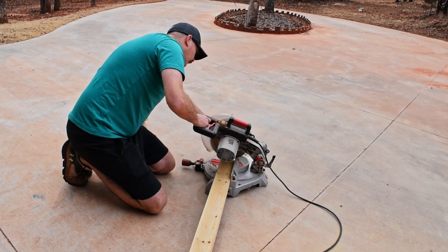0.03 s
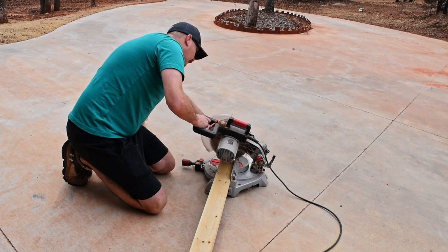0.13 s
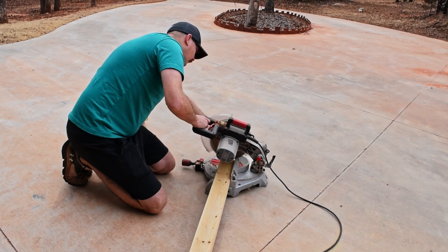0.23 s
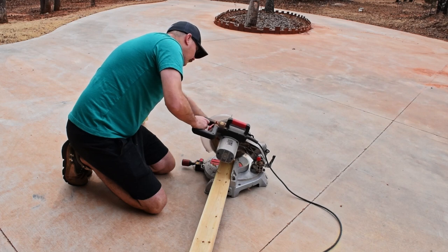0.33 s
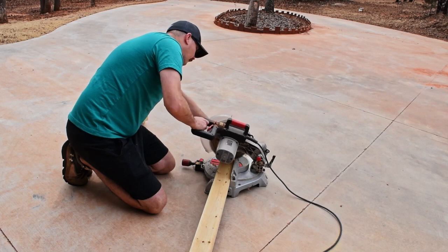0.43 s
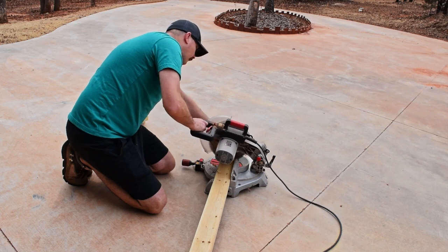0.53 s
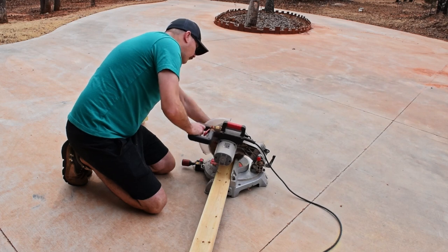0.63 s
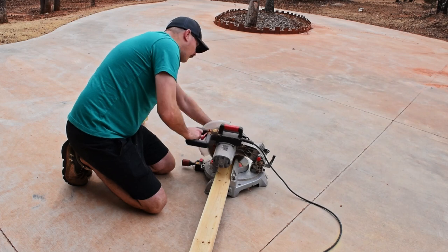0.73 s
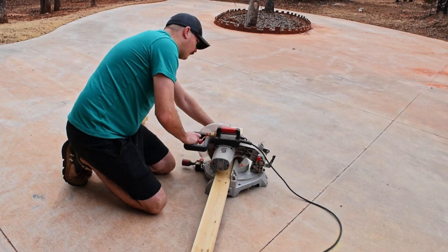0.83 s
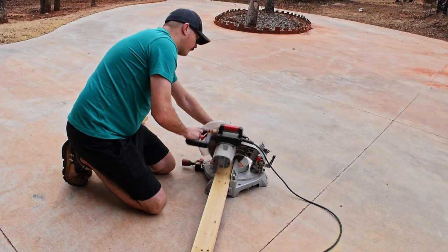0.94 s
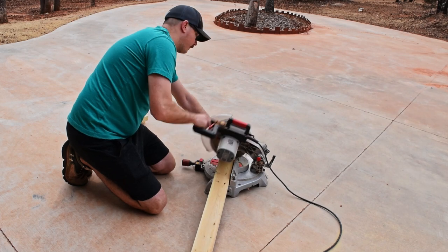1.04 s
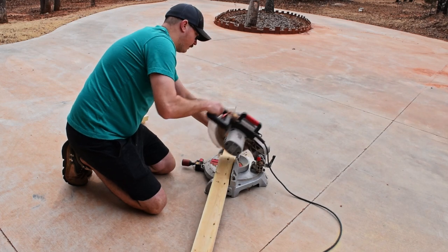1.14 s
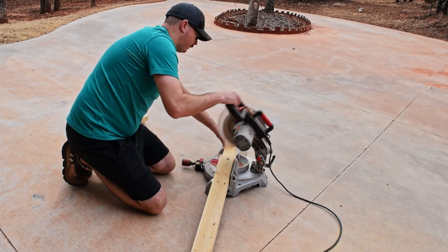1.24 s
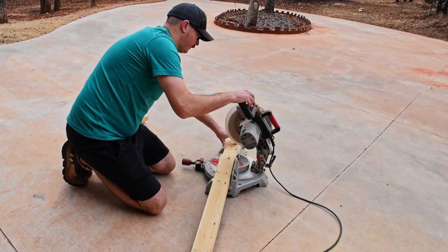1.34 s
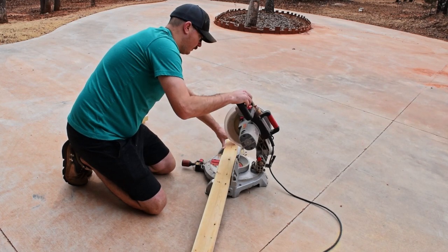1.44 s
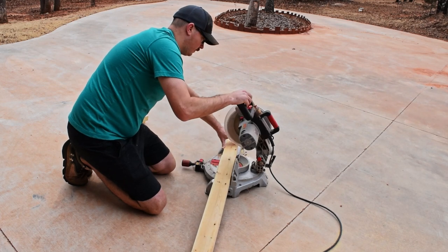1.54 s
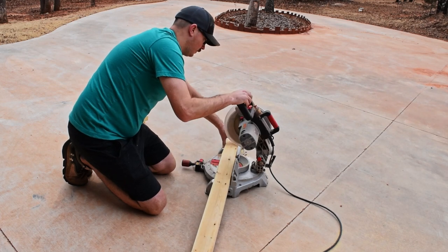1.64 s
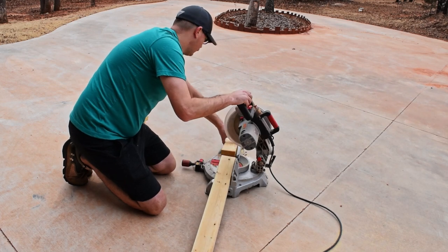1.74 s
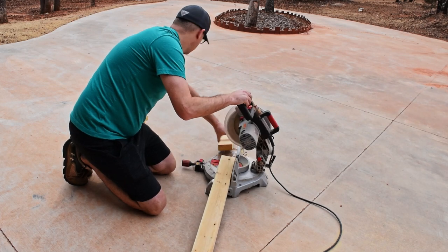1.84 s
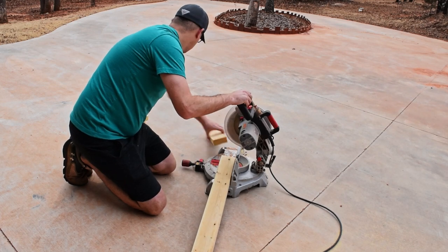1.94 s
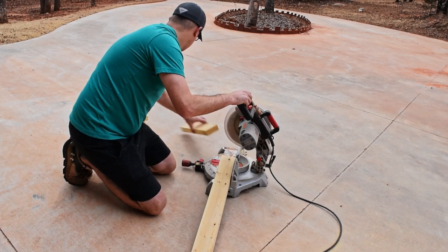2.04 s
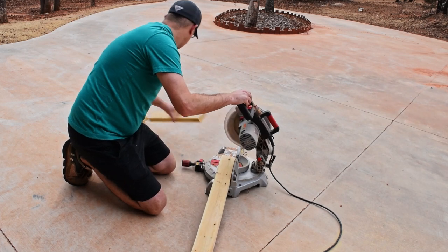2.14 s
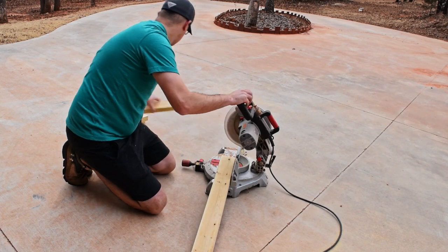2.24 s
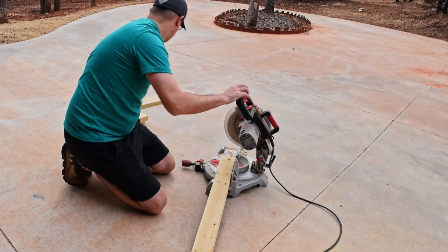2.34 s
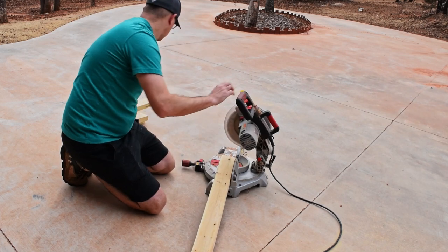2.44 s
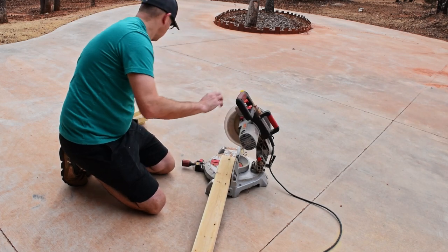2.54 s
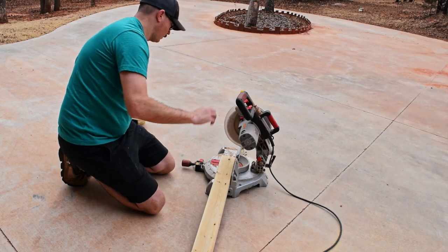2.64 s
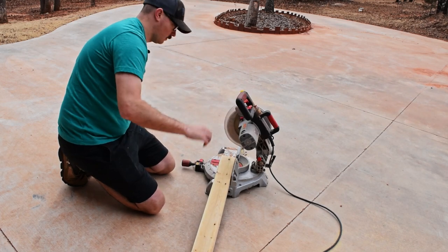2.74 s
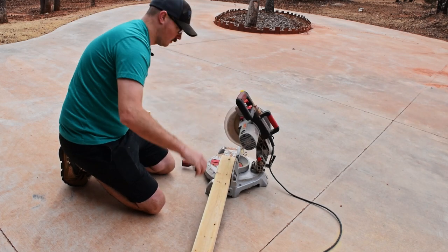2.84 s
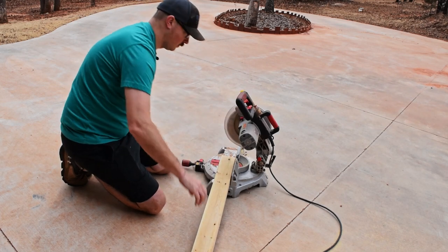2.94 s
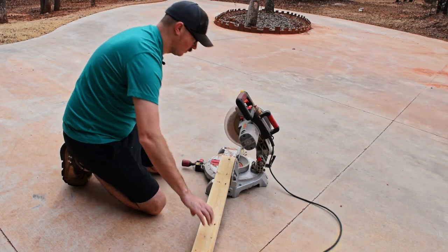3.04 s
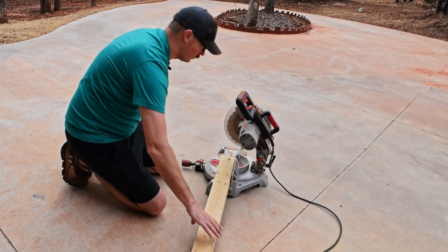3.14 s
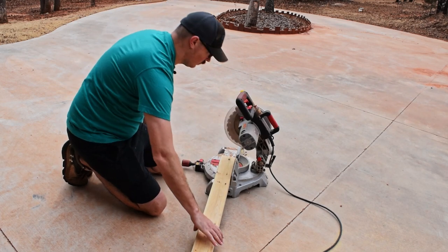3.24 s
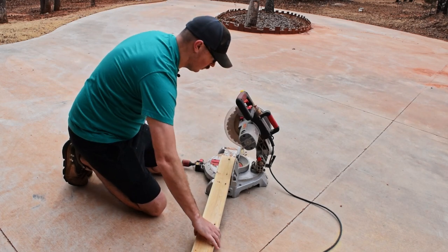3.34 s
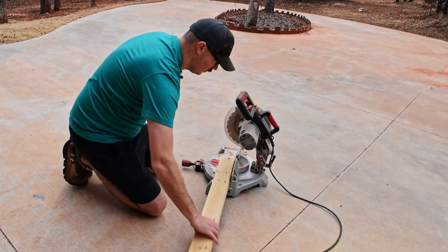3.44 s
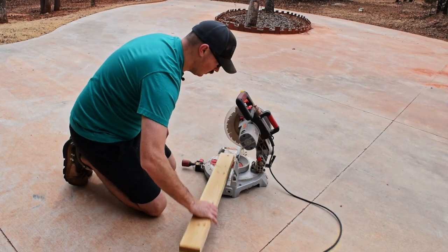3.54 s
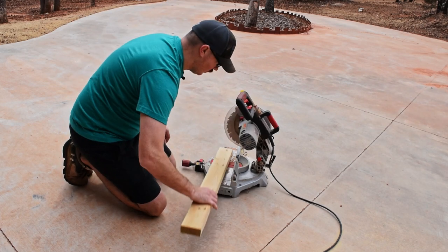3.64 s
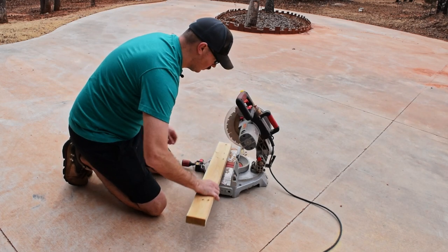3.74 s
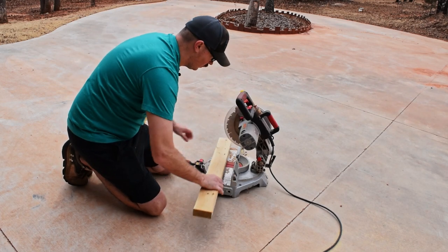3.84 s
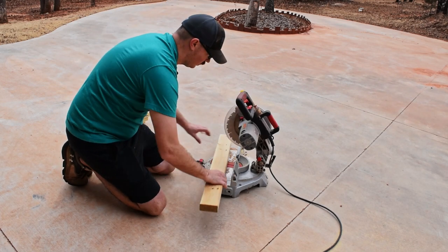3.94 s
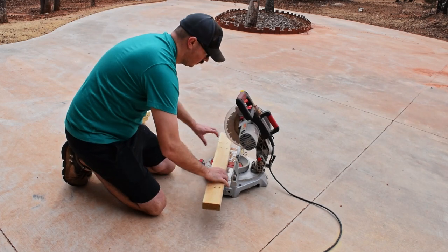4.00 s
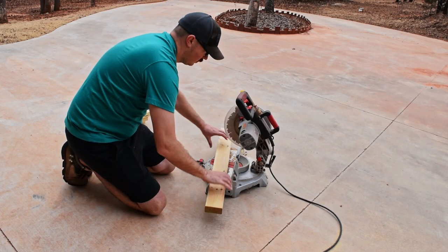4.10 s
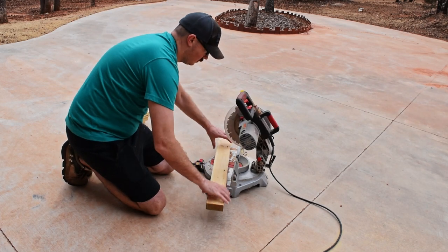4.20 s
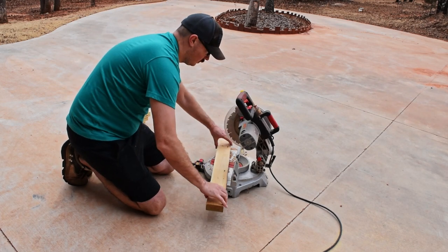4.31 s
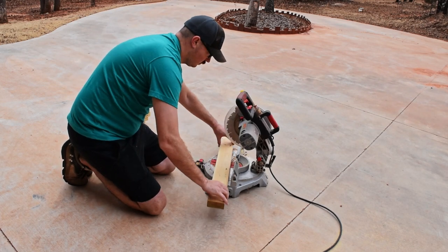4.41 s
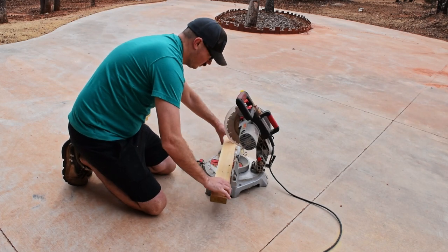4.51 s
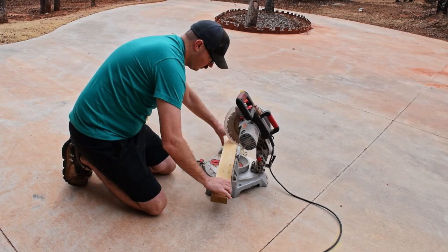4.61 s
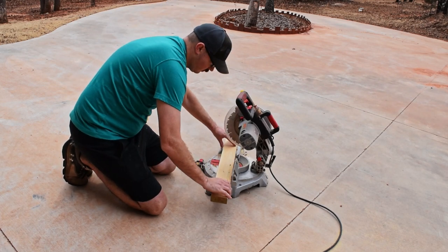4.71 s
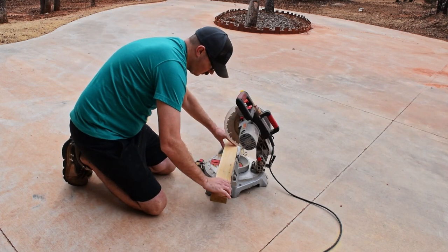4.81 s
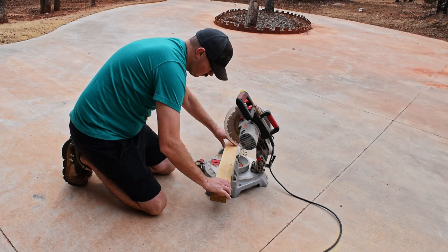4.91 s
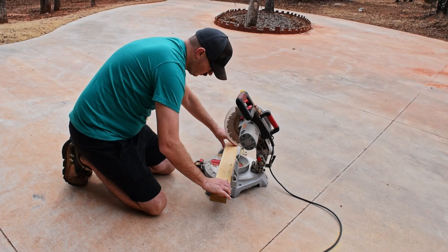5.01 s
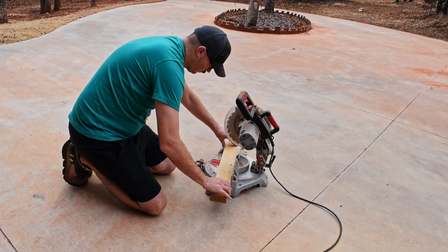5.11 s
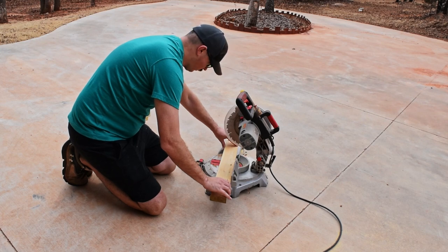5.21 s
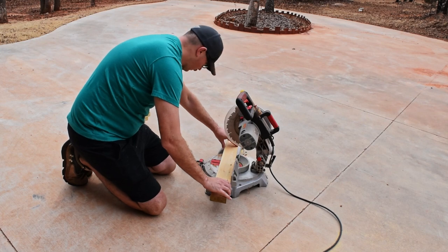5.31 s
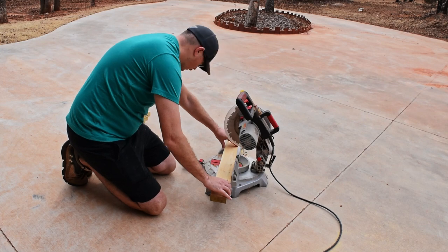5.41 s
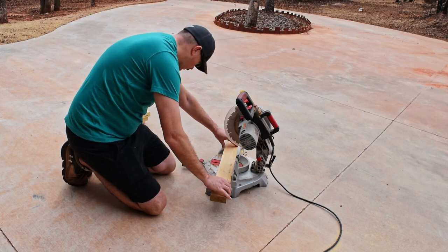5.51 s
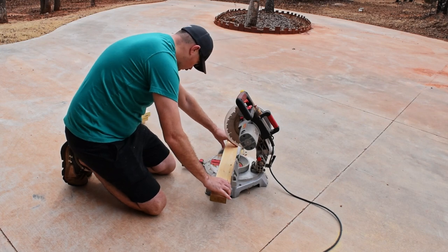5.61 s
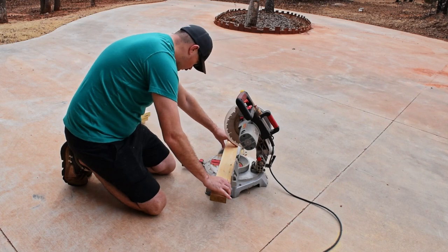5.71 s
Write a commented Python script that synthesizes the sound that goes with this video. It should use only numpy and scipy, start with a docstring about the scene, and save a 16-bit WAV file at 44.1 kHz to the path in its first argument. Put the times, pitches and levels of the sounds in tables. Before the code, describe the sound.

An electric saw rips through wood and winds down outdoors, followed by a block clacking on concrete and a board sliding and knocking.

```python
"""On an outdoor concrete slab, a miter saw tears through the end of a cut, races free and is braked.
Its whine sinks with the blade's speed and the slack gears rattle as it runs down. The offcut knocks
on the saw table and is put down; then the long board is dragged over grit and bumped against the
fence, over a faint breeze. One microphone feeds two channels at unequal gain, each with a fast limiter."""
import sys
import numpy as np
from scipy import signal
from scipy.fft import rfft, irfft, next_fast_len
from scipy.io import wavfile
from scipy.ndimage import uniform_filter1d, minimum_filter1d, map_coordinates

SR = 44100
rng = np.random.default_rng(int(sys.argv[2]) if len(sys.argv) > 2 else 0)


def store_pcm(level_fs):
    """Save levels as 16-bit WAV."""
    pcm = np.round(np.clip(level_fs, -1, 1) * 32767).astype(np.int16)
    wavfile.write(sys.argv[1], SR, np.atleast_2d(pcm).T)


N = 253948
TIME = np.arange(N) / SR
TOP_HZ = 15800

# The course of the cut. Each row: time in seconds, then tearing, rasp and blade hiss levels in dB.
CUT_LEVELS = [(0.0, -37.5, -45.5, -43), (0.1, -28.5, -37, -33.5), (0.55, -26, -32, -26),
              (0.63, -32, -29.5, -23), (0.7, -26, -28, -30.5), (0.79, -36.5, -44.5, -49.5),
              (0.82, -67, -55, -79.5)]


def saw():
    """One speed drives the whine, the fan air, the blade's hiss and the rattling gear case."""
    # The motor bogs down, races free, is braked and coasts. Each row: time in seconds, tooth rate in Hz.
    speed = [(0, 1740), (.12, 1712), (.25, 1655), (.4, 1540), (.6, 1310), (.7, 1386), (.8, 1778),
             (.95, 2170), (1.0, 2190), (1.1, 1790), (1.22, 1360), (1.3, 1130), (1.48, 805), (1.78, 459),
             (2.1, 290), (2.55, 180), (2.93, 106), (3.15, 58), (3.7, 5)]
    tooth_hz = np.exp(curves([(s, np.log(hz)) for s, hz in speed])[0])
    tooth_cycles = np.cumsum(tooth_hz) / SR
    fan = running(tooth_hz, db=-48, knee_hz=945, db_per_octave=10.34)
    gears = gear_case(tooth_hz)
    air = rushing_air(tooth_hz, fan)
    cut = cutting(tooth_cycles)
    waver = amp(1.3 * wobble(24))
    return cut + gears + air * waver + whine(tooth_hz, tooth_cycles, fan) + singing_metal()


def cutting(tooth_cycles):
    """Teeth tear the wood in bursts and keep the blade ringing; the rasp grows as the blade digs in."""
    # Tone of tearing wood. Each row: frequency in Hz, level in dB.
    wood_colour = [(59, -56.5), (100, -18.5), (258, -14), (438, -14), (564, -14), (712, 4), (861, -2.5),
                   (1370, -16.5), (2580, -12.5), (3930, -10), (5510, -2), (7250, -1), (9740, -2.5),
                   (13100, 3), (15500, 3)]
    # Plate modes of the blade. Each row: frequency in Hz, level in dB.
    blade_modes = [(4829, -62), (4980, -53.5), (5453, -53), (6121, -57), (6740, -55), (7660, -63),
                   (7865, -59), (8489, -49), (8629, -65), (9049, -62), (9458, -61), (9615, -58),
                   (10196, -60), (10320, -53.5), (10519, -52), (11267, -56), (11515, -56.5), (11913, -50.5),
                   (12096, -56), (12462, -63.5), (12758, -61), (13539, -52.5), (14233, -57.5),
                   (14519, -60.5)]
    tear, rasp, _ = levels(CUT_LEVELS)
    bites = wide_noise() * (1 + .5 * np.cos(2 * np.pi * tooth_cycles))
    chips = coloured(rippled(bites, depth_db=1.8, spacing_hz=40), wood_colour)
    low = filtered(chips, lambda hz: 1 / (1 + (hz / 8200) ** 8))
    plate = unit(sum(amp(db) * noise_band(hz, 36) for hz, db in blade_modes))
    return tear * (amp(-2.5) * unit(chips - low) + amp(-10) * plate) + amp(-1.5) * rasp * unit(low)


def whine(tooth_hz, tooth_cycles, fan):
    """Harmonics of the tooth rate, sung by the teeth in the wood and then by the braked gears."""
    # Each row: multiple of the tooth rate, level in dB while braking, level in dB while cutting.
    harmonics = [(1, -17, -20), (2, -6, -20), (3, -28, -18), (4, -14.5, -21), (5, -24, -19), (6, -22, -13),
                 (7, -27, -14), (8, -20, -18), (9, -33, -11), (10, -30, -13.5), (12, -10, -30)]
    # How well the casing radiates the gears. Each row: frequency in Hz, gain in dB.
    casing_response = [(300, 0), (900, 4), (1200, 0), (1600, -1), (1900, -9), (2200, -4), (2450, 2),
                       (2800, -8), (3200, -6), (3650, 3), (4150, -5), (4650, 2), (5200, -3), (6200, 1),
                       (7000, -3), (7800, 1), (8700, -3), (9700, 14), (10900, 1), (13000, 6), (14000, 6),
                       (15000, -9)]
    # How well the blade radiates its teeth. Each row: frequency in Hz, gain in dB.
    blade_response = [(1400, 2), (3100, 0.5), (5000, 0.5), (7800, -6), (8500, 3.5), (9500, 3.5),
                      (10300, -3.5), (13600, -2.5), (14500, 3), (15500, 0)]
    # How hard the teeth are loaded. Each row: time in seconds, gain in dB.
    tooth_load = [(0, -2), (.3, 0), (.5, 3), (.63, -10), (.8, -25)]
    load = levels(CUT_LEVELS)[0] * levels(tooth_load)[0]
    brake_db = 8 * ramp(1.0, .26) - 4  # the brake loads the gears
    gear_gain = fan * amp(brake_db) * (tooth_hz / 1300) ** 0.093
    out = np.zeros(N)
    for order, braking_db, cutting_db in harmonics:
        hz, phase = order * tooth_hz, 2 * np.pi * order * tooth_cycles
        # Each gear partial is part tone, part noise band that narrows as it sinks.
        fray = np.clip(.68 + hz / 35000, 0, .99)
        width_hz = 900 * (hz / 10000) ** 2 + 20
        drift = np.cumsum(width_hz) / SR
        a, b = (map_coordinates(rng.standard_normal(SR // 2), [drift]) for _ in range(2))
        blur = (a * np.sin(phase) + b * np.cos(phase)) / np.sqrt(2)
        partial = np.sqrt(1 - fray ** 2) * np.sin(phase) + fray * blur
        gears = amp(braking_db + along(casing_response, hz)) * gear_gain * partial
        # The teeth grip unevenly, breaking up level and phase most in the treble.
        uneven = np.sqrt(hz / 10000)
        grip = unit(amp(4 * uneven * wobble(45)))
        jitter = .8 * uneven * wobble(160)
        teeth = amp(cutting_db + along(blade_response, hz)) * load * grip * np.sin(phase + jitter)
        flutter = amp(3.2 * wobble(30))
        out += (hz < TOP_HZ) * (flutter * gears + teeth)
    return out


def gear_case(tooth_hz):
    """The brake first holds the gears tight and quiet; then they go slack and rattle."""
    tight_s, slack_s = 1.05, 1.32
    held = ramp(tight_s, 0.12) - ramp(slack_s, 0.012)
    gain = running(tooth_hz, db=-44, knee_hz=1240, db_per_octave=5.97) * amp(-9 * held)
    slow = ramp(2.15, .25)  # the gears grow too slow to ring the castings
    return gain * churn(slow) + backlash(gain, slack_s, slow)


def churn(slow):
    """Turning gears churn in their case, darker as they slow down."""
    # Tone of the gear case at speed. Each row: frequency in Hz, level in dB.
    fast_colour = [(59, -63), (100, -37), (275, -18.5), (392, -1.5), (627, -5.5), (723, 4), (799, -5.5),
                   (975, -10), (1050, -9.5), (1930, -21), (2490, -25.5), (2790, -31), (3000, -25.5),
                   (3900, -57.5), (6600, -120)]
    # Its tone near rest. Each row: frequency in Hz, level in dB.
    slow_colour = [(110, -48.5), (180, -16), (253, -13.5), (406, 0.5), (605, -8.5), (722, 2.5), (812, -10),
                   (1380, -8.5), (1850, -20), (2130, -20.5), (3000, -30.5), (3900, -60.5), (6600, -120)]
    bright = unit(coloured(noise(), fast_colour) + 0.53 * unit(lowpass(castings(noise()), 3700)))
    bright *= amp(0.53 * wobble(40))
    dark = unit(lowpass(lowpass(coloured(noise(), fast_colour), 560), 560))
    dark_share = 0.31 * ramp(1.43, 1.7)
    turning = np.sqrt(1 - dark_share) * bright + np.sqrt(dark_share) * dark
    return np.sqrt(1 - slow) * turning + np.sqrt(slow) * amp(-1.5) * coloured(noise(), slow_colour)


def backlash(case_gain, slack_s, slow):
    """Gear teeth clack through the castings; lesser, uneven chatter fades along with the churn."""
    # The hardest clacks. Each row: time in seconds, level in dB.
    hard_clacks = [(0.80, -27), (0.822, -25), (0.862, -28), (0.982, -28), (1.254, -30), (1.336, -20),
                   (1.367, -22), (1.388, -19.5), (1.432, -20), (1.464, -22), (1.51, -20.5), (1.586, -20),
                   (1.63, -27), (1.649, -20.5), (1.706, -26), (1.776, -29), (1.832, -30), (1.875, -30),
                   (2.584, -33)]
    chatter_per_s, stop_s = 28, 3.7
    clacks = bursts(hard_clacks, t60=.06)
    gaps, sizes = rng.standard_normal((100, 2)).T
    times = slack_s + np.cumsum(np.exp(.4 * gaps)) / chatter_per_s
    chatter = [(s, 20 * np.log10(case_gain[int(s * SR)]) + 2 + 2.5 * size)
               for s, size in zip(times, sizes) if s < stop_s]
    clacks += amp(-7.5 * slow) * bursts(chatter, t60=.06)
    return amp(5.5) * lowpass(castings(clacks), 3500) + amp(-35) * lowpass(clacks, 3800)


def castings(x):
    """The saw's castings colour a sound with their resonances."""
    # Each row: frequency in Hz, width in Hz, level in dB.
    modes = [(393, 97, -7), (560, 30, -5), (719, 22, 2.5), (1058, 100, -9), (1416, 280, -16),
             (2156, 110, -20)]
    return filtered(x, lambda f: sum(
        (-1) ** k * amp(db) * 1j * f * width / (hz ** 2 - f ** 2 + 1j * f * width)
        for k, (hz, width, db) in enumerate(modes)))


def rushing_air(tooth_hz, fan):
    """The fan blows and the spinning blade hisses, both louder in the cut."""
    # Tone of the fan air. Each row: frequency in Hz, level in dB.
    fan_colour = [(710, -21.5), (1200, -2), (1350, -3.5), (1510, -9), (1900, -6.5), (2170, -8.5),
                  (2810, -19), (3330, -9.5), (3700, -7), (4190, -10.5), (4450, -7), (5350, -9.5),
                  (5780, -9.5), (6950, -12.5), (7500, -13.5), (9750, -44), (16500, -120)]
    # Tone of the blade's hiss. Each row: frequency in Hz, level in dB.
    hiss_colour = [(4120, -29.5), (7000, -7), (7430, -16.5), (7860, -3), (8520, -0.5), (9040, -4),
                   (9440, 1), (9790, -1.5), (11400, -5), (12800, -5), (13600, -5.5), (15500, -21)]
    _, rasp, rub = levels(CUT_LEVELS)
    spin = running(tooth_hz, db=-51.5, knee_hz=976, db_per_octave=13.3)
    blowing = (fan + amp(-9) * rasp) * coloured(rippled(noise()), fan_colour)
    hiss = (spin + rub) * coloured(rippled(wide_noise()), hiss_colour)
    return amp(-3) * (blowing + hiss)


def singing_metal():
    """The rubbed blade sings, and the saw's base drones as the blade breaks through."""
    # Blade squeals. Each row: start and end in seconds, pitch and width in Hz, level in dB.
    blade_bands = [(.48, .76, 10930, 3400, -26), (.62, .83, 4820, 30, -45.5), (.9, 1.9, 9630, 1100, -59.5),
                   (.95, 1.5, 13350, 3000, -58), (1.0, 2.7, 4580, 220, -85), (1.1, 2.3, 7870, 120.5, -74.5),
                   (1.3, 2.3, 13200, 810, -84), (1.5, 2.7, 9670, 700, -81)]
    # Drone of the base. Each row: start and end in seconds, pitch and width in Hz, level in dB.
    base_bands = [(.78, .99, 722, 30, -48), (.78, .96, 585, 45, -50), (.74, .89, 1050, 260, -51)]
    # Clear blade notes, in the cut and near rest. Each row: start and end in seconds, Hz, level in dB.
    blade_notes = [(-.2, .44, 5452, -50), (-.2, .44, 5482, -51), (2.85, 3.56, 1362, -70),
                   (3.0, 3.3, 2560, -90)]
    notes = sum(amp(db) * swell(start, end) * np.sin(2 * np.pi * hz * TIME)
                for start, end, hz, db in blade_notes)
    return squeals(blade_bands) + squeals(base_bands) + notes


def offcut():
    """The short block knocks twice on the saw table and is later put down on the slab with a crack."""
    # Knocks on the table. Each row: time in seconds, level in dB, hardness as tilt in dB per octave.
    table_hits = [(0.888, -24, 3), (1.019, -25, -1)]
    # The block ringing on the table. Each row: frequency in Hz, level in dB, T60 in seconds.
    table_modes = [(579, -16, 0.2), (1057, 0, 0.15), (1160, -10, 0.05), (1302, -11, 0.085),
                   (1420, -9, 0.04), (1656, -8, 0.085), (2280, -22, 0.05), (3150, -19, 0.04),
                   (3680, -17, 0.029)]
    # The landing on concrete. Each row: time in seconds, level in dB.
    slab_hits = [(2.642, -29)]
    # The block ringing on the slab. Each row: frequency in Hz, level in dB, T60 in seconds.
    slab_modes = [(716, -12.5, 0.11), (869, 0.5, 0.1), (1110, -13.5, 0.036), (1370, -8, 0.05),
                  (1600, -11, 0.05), (1760, -13, 0.039), (2020, -5.5, 0.02), (2820, -2.5, 0.034),
                  (3900, -17.5, 0.039), (4900, -25.5, 0.035)]
    blows = [(s, db) for s, db, _ in table_hits]
    octaves = np.log2([mode[0] for mode in table_modes])
    lifts = [tilt * octaves for _, _, tilt in table_hits]
    ring = struck(blows, table_modes, scatter_db=1.5, detune=0.003, lifts=lifts)
    contact_hz = 800  # so small a contact radiates no bass
    knocks = ring + amp(-14) * highpass(lowpass(bursts(blows, t60=0.06), 3800), contact_hz)
    crack = highpass(lowpass(lowpass(bursts(slab_hits, t60=0.055), 1400), 7600), contact_hz)
    clack = struck(slab_hits, slab_modes, scatter_db=6, detune=0.0015) + amp(3) * crack
    return amp(11) * knocks + amp(7.5) * clack


def board_bumps():
    """The long board bumps table and fence; where and how hard it lands decides which modes ring."""
    # Each row: time in seconds, level in dB, crack in dB relative to that, favoured pitch in Hz.
    bumps = [(3.534, -27.5, -16.5, 730), (3.683, -43, -54, 387), (3.839, -45.5, -19, 445),
             (3.92, -42, -36, 400), (3.975, -42.5, -10.5, 1130), (4.066, -39, -25, 398),
             (4.089, -15.5, -14.5, 570), (4.14, -28.5, -28, 388), (4.18, -26.5, -23, 563),
             (4.196, -24.5, -13, 637), (4.276, -25, -25.5, 350), (4.317, -32, -27, 357),
             (4.34, -30.5, -22, 570), (4.577, -31, -26, 372), (4.881, -39, -33, 422)]
    # Modes of the board. Each row: frequency in Hz, level in dB, T60 in seconds.
    board_modes = [(235.6, -16.5, 0.28), (360.6, 2.5, 0.14), (337, -3.5, 0.1), (439.5, -3, 0.26),
                   (513, -12.5, 0.11), (570, -3, 0.21), (646, -2, 0.089), (767, 1, 0.086), (868, -4, 0.063),
                   (1101, -9, 0.12), (1320, -10.5, 0.088), (1640, -13.5, 0.059), (2300, -28, 0.08),
                   (3200, -41, 0.013)]
    # Grit cracking under the board. Each row: time in seconds, level in dB.
    grit_ticks = [(3.5326, -41), (3.585, -46), (3.613, -53), (3.6768, -53), (3.759, -54.5), (3.8235, -52.5),
                  (3.873, -47.5), (3.915, -56), (3.9477, -58), (3.9749, -45.5), (4.1979, -29),
                  (4.4805, -62), (4.5314, -55.5), (4.6074, -51), (4.879, -55), (4.9946, -55), (5.271, -50)]
    favour_db, favour_octaves = 7, 0.22
    blows = [(s, db) for s, db, _, _ in bumps]
    cracks = [(s, db + crack_db) for s, db, crack_db, _ in bumps]
    octaves = np.log2([mode[0] for mode in board_modes])
    lifts = []
    for _, _, crack_db, hz in bumps:
        tilt = 0.5 * (crack_db + 23)  # a harder crack rings brighter
        nearness = np.exp(-((octaves - np.log2(hz)) / favour_octaves) ** 2)
        lifts.append(tilt * octaves + favour_db * nearness)
    ring = amp(-3) * struck(blows, board_modes, scatter_db=3.5, detune=0.018, lifts=lifts)
    table = amp(-1.5) * lowpass(castings(bursts(blows, t60=0.24)), 3200)
    contact = amp(1) * lowpass(lowpass(bursts(cracks, t60=0.09), 4000), 9800)
    ticks = amp(-10) * lowpass(bursts(grit_ticks, t60=0.03), 8270)
    return ring + table + contact + ticks


def board_drag():
    """The pushed board catches and slips, groaning and scraping while its edge chirrs on the table."""
    # Each row: start and end in seconds, groan level in dB, scrape level in dB.
    pushes = [(3.194, 3.66, -75.5, -72.5), (3.489, 3.766, -59.5, -65), (3.786, 4.134, -60, -69.5),
              (4.034, 4.415, -54.5, -70), (4.323, 4.675, -62.5, -67), (4.696, 4.943, -72.5, -71.5),
              (4.944, 5.545, -84, -86)]
    # Tone of the groan. Each row: frequency in Hz, level in dB.
    groan_colour = [(88, -44), (150, -17.5), (370, 0.5), (737, -5.5), (835, -12.5), (1020, -7.5),
                    (1260, -19), (1660, -13.5), (1930, -28), (2280, -30), (3000, -49.5), (3900, -67.5),
                    (6600, -120)]
    # Tone of the scrape. Each row: frequency in Hz, level in dB.
    scrape_colour = [(1180, -12), (2000, -5), (2250, -24), (2410, -6.5), (2750, -11.5), (3770, -2),
                     (4070, -6.5), (4440, -6), (6200, -10.5), (10500, -14), (15500, -25.5)]
    # Chirrs of the edge. Each row: start and end in seconds, pitch and width in Hz, level in dB.
    edge_bands = [(3.15, 3.8, 4010, 1393, -82.5), (3.52, 3.61, 12000, 8000, -68.5),
                  (3.98, 4.12, 11900, 8060, -75), (4.088, 4.112, 2500, 1200, -48.5),
                  (4.193, 4.228, 7500, 3980, -64), (4.37, 4.56, 3780, 446, -76),
                  (4.39, 4.6, 11700, 5040, -80), (4.44, 4.58, 5420, 1200, -77),
                  (4.68, 4.8, 3780, 1174, -77), (4.69, 4.8, 7660, 3760, -78)]
    groan_gain = sum(amp(db) * swell(start, end) for start, end, db, _ in pushes)
    scrape_gain = sum(amp(db) * swell(start, end) for start, end, _, db in pushes)
    stick_slip = amp(2 * wobble(50))
    groan = amp(4) * groan_gain * coloured(stick_slip * noise(), groan_colour)
    roughness = rippled(noise()) * amp(3.1 * wobble(700))
    scrape = amp(-6.5) * scrape_gain * coloured(stick_slip * roughness, scrape_colour)
    chirrs = squeals(edge_bands) * unit(amp(5.2 * wobble(170)))
    grit = crushed_grit(scrape_gain * stick_slip, start=pushes[0][0], end=pushes[-1][1])
    return groan + scrape + chirrs + grit


def crushed_grit(push, start, end):
    """Grains crack at random times, each at its own pitch, with a strength that follows the push."""
    grains_per_s, middle_hz, spread_octaves, ring_cycles = 280, 6500, .7, 1.2
    gap, size, pitch = rng.standard_normal((1500, 3)).T
    times = start + np.cumsum(np.exp(.8 * gap - .32)) / grains_per_s
    onsets = (np.minimum(times, end) * SR).astype(int)[:, None]
    age = np.arange(SR // 100)
    hz = np.minimum(middle_hz * 2 ** (spread_octaves * pitch), SR / 2)
    cycles = hz[:, None] * age / SR
    strength = push[onsets] * amp(-5.5 - 3.5 * size[:, None])
    grains = strength * np.sin(2 * np.pi * cycles) * np.exp(-cycles / ring_cycles)
    return np.bincount((onsets + age).ravel(), grains.ravel(), N)[:N]


def yard_echo(x):
    """A short answer from the slab and trees, different in each channel."""
    t, t60 = np.arange(SR // 3) / SR, 0.21
    tail = rng.standard_normal((2, len(t))) * amp(-60 * t / t60)
    return signal.fftconvolve(x, tail / np.linalg.norm(tail[0]), axes=1)[:, :N]


def breeze():
    """Low outdoor rumble in soft lumps, with a few gusts, over a faint even hush."""
    # Each row: start and end in seconds, level in dB.
    gusts = [(0.343, 0.79, -64), (2.29, 2.537, -71), (2.847, 3.254, -81), (3.852, 4.16, -72.5),
             (4.35, 5.457, -78.5)]
    # Tone of the rumble and of the hush. Each row: frequency in Hz, level in dB.
    rumble_colour = [(15, -11.5), (30, -4.5), (60, -2.5), (110, -4.5), (200, -17), (500, -21.5),
                     (1500, -37.5), (4000, -92.5)]
    hush_colour = [(100, -17), (400, 1.5), (1200, -10), (2500, -21.5), (15000, -27.5)]
    strength = amp(-81) + sum(amp(db) * swell(start, end) for start, end, db in gusts)
    centre, *sides = [coloured(noise() * amp(7.1 * wobble(33)), rumble_colour) for _ in range(3)]
    return strength * (2 * centre + 0.34 * np.array(sides)) + amp(-78.5) * coloured(noise(), hush_colour)


def struck(blows, modes, scatter_db, detune, lifts=None):
    """Each (seconds, dB) blow rings the modes a little differently; lifts adds dB per blow and mode."""
    out, t = np.zeros(N + SR), np.arange(SR // 2) / SR
    hz, level, t60 = np.transpose(modes)[:, :, None]
    for (s, db), lift in zip(blows, lifts or [0] * len(blows)):
        size, phase, shift = rng.standard_normal((3, len(modes), 1))
        decay = amp(level + np.reshape(lift, (-1, 1)) + scatter_db * size - 60 * t / t60)
        ring = np.sum(decay * np.sin(2 * np.pi * (hz * (1 + detune * shift) * t + phase)), axis=0)
        ring *= 1 - np.exp(-t / .0004)  # soften the attack
        out[round(s * SR):][:len(t)] += amp(db) * ring / np.abs(ring).max()
    return out[:N]


def bursts(hits, t60):
    """Noise that starts at each (seconds, dB) hit and dies away."""
    envelope, t = np.zeros(N + SR), np.arange(SR // 2) / SR
    for s, db in hits:
        envelope[round(s * SR):][:len(t)] += amp(db - 60 * t / t60)
    return envelope[:N] * noise()


def squeals(bands):
    """Each rubbed resonance swells and fades as a band of noise."""
    return sum(amp(db) * swell(start, end) * noise_band(hz, width) for start, end, hz, width, db in bands)


def running(tooth_hz, db, knee_hz, db_per_octave):
    """Gain of a running noise: steady at speed, fading as the tooth rate falls below the knee."""
    octaves_below = np.log2(1 + (knee_hz / tooth_hz) ** 4) / 4
    return amp(db - db_per_octave * octaves_below)


def noise():
    """White noise."""
    return rng.standard_normal(N)


def wide_noise():
    """White noise that differs a little between the channels."""
    return noise() + .16 * rng.standard_normal((2, N))


def noise_band(hz, width_hz):
    """A tone blurred into a band by random level and phase."""
    phase = 2 * np.pi * hz * TIME
    return wobble(width_hz) * np.sin(phase) + wobble(width_hz) * np.cos(phase)


def wobble(rate):
    """A smooth random curve, rate knots a second."""
    return map_coordinates(rng.standard_normal(int(N * rate / SR) + 4), [TIME * rate])


def filtered(x, response):
    """Apply a frequency response, given as a function of Hz."""
    size = next_fast_len(N + SR // 2)
    return irfft(rfft(x, size) * response(np.fft.rfftfreq(size, 1 / SR)), size)[..., :N]


def coloured(x, spectrum):
    """Shape by (Hz, dB) points, at rms 1."""
    return unit(filtered(x, lambda hz: amp(along(spectrum, hz))))


def rippled(x, depth_db=2.2, spacing_hz=130):
    """Many weak resonances ripple the spectrum."""
    knots = rng.standard_normal(SR // 60)
    return filtered(x, lambda hz: amp(depth_db * map_coordinates(knots, [hz / spacing_hz])))


def lowpass(x, corner_hz):
    """A causal two-pole low-pass."""
    return filtered(x, lambda f: 1 / (1 + 1j * f / corner_hz) ** 2)


def highpass(x, corner_hz, poles=1):
    """A causal high-pass."""
    return filtered(x, lambda f: (1j * f / (1j * f + corner_hz)) ** poles)


def along(points, hz):
    """Read (Hz, value) points on a log axis."""
    freqs, values = np.transpose(points)
    return np.interp(np.log(hz + 1), np.log(freqs + 1), values)


def curves(rows):
    """One value per sample for each column after the time."""
    times, *columns = np.transpose(rows)
    return [np.interp(TIME, times, column) for column in columns]


def levels(rows):
    """Gains from dB curves, dying away after their last point."""
    release = np.exp(-np.maximum(TIME - rows[-1][0], 0) / 0.071)
    return [amp(db) * release for db in curves(rows)]


def ramp(start, length):
    """Rises from 0 to 1 over length seconds."""
    return np.clip((TIME - start) / length, 0, 1)


def swell(start, end):
    """A half sine between two times."""
    return np.sin(np.pi * ramp(start, end - start))


def amp(db):
    """Decibels to gain."""
    return 10 ** (np.asarray(db) / 20)


def unit(x):
    """Scale to rms 1."""
    return x / np.sqrt(np.mean(x ** 2) + 1e-20)


def scene():
    """All sources, a little stronger on the right; saw and boards radiate little bass."""
    direct = highpass(amp(5) * saw() + offcut() + board_bumps() + board_drag(), 90, poles=2)
    return (direct + amp(-29.5) * yard_echo(direct) + breeze()) * amp([[-1.5], [1.4]])


def record(dry):
    """Brief level dips, a closing fade, a fast limiter and rounded peaks per channel, a band limit."""
    # The level dips briefly. Each row: time in seconds, half width in seconds, depth in dB.
    dips = [(2.298, 0.012, -11.5), (2.853, 0.02, -41), (2.906, 0.0091, -18.5), (3.797, 0.013, -28)]
    limit_db, ceiling_db = -24, -22.5
    dips_db = sum(db * np.exp(-((TIME - s) / width) ** 2) for s, width, db in dips)
    fade_db = -21.5 * ramp(5.5, 0.055)
    x = dry * amp(dips_db + fade_db)
    loudness = np.sqrt(np.abs(uniform_filter1d(x ** 2, size=8))) + 1e-9
    limiter_gain = np.minimum(1, amp(limit_db) / loudness)
    x = x * uniform_filter1d(minimum_filter1d(limiter_gain, size=25), size=17)
    x = x / (1 + np.abs(x / amp(ceiling_db)) ** 8) ** (1 / 8)
    return filtered(x, lambda hz: 1 / (1 + (hz / TOP_HZ) ** 400))


dry = scene()
out = record(dry)
store_pcm(out)
```